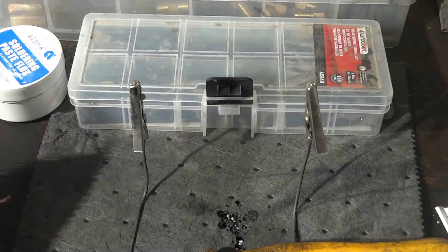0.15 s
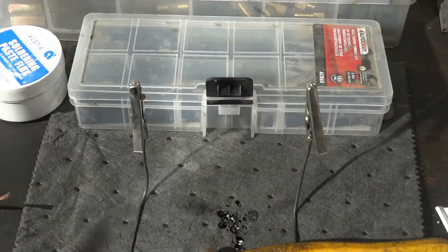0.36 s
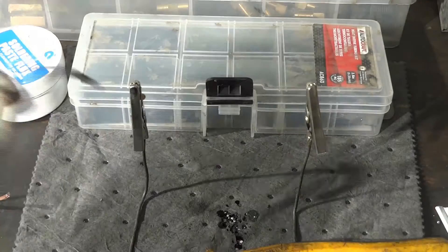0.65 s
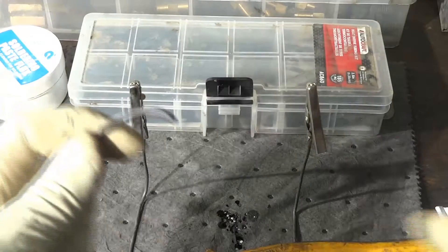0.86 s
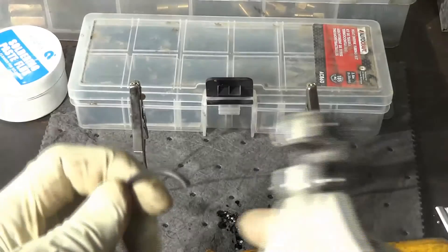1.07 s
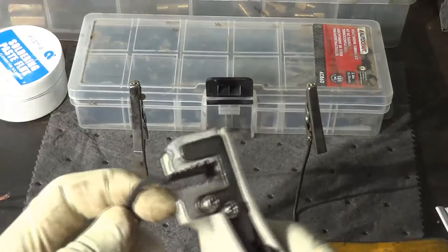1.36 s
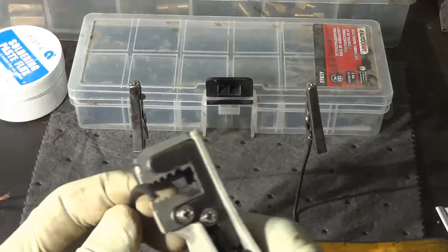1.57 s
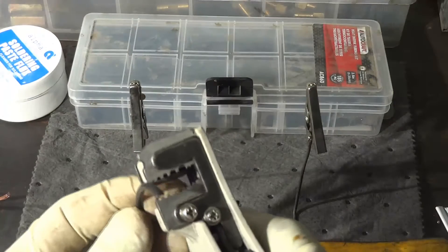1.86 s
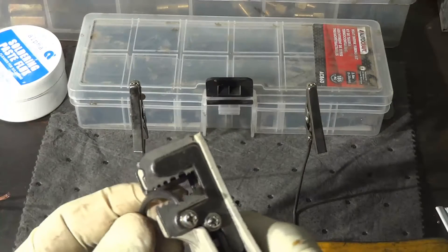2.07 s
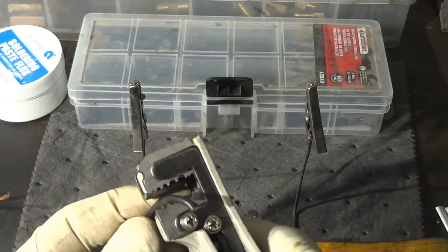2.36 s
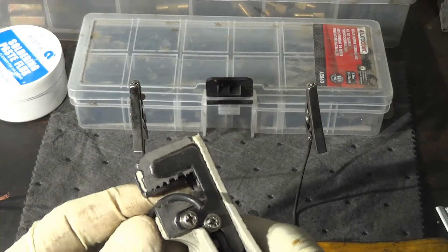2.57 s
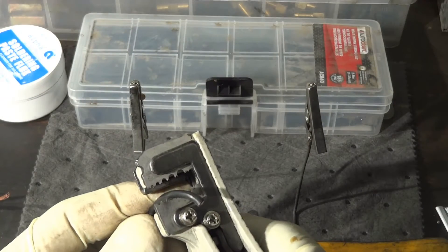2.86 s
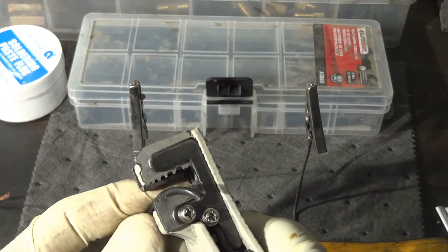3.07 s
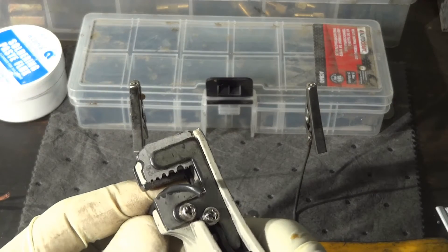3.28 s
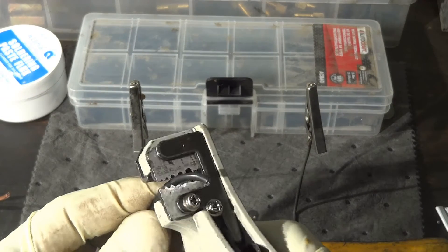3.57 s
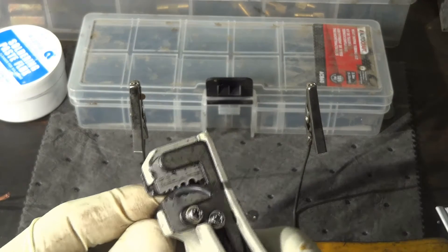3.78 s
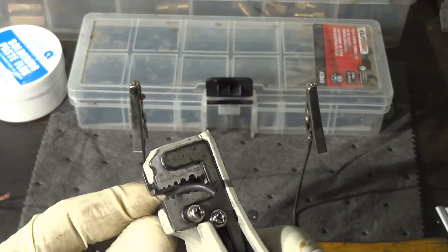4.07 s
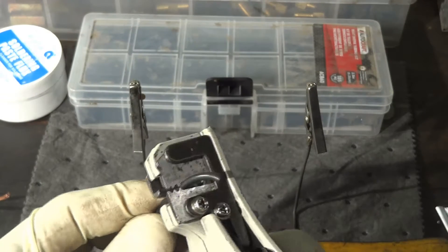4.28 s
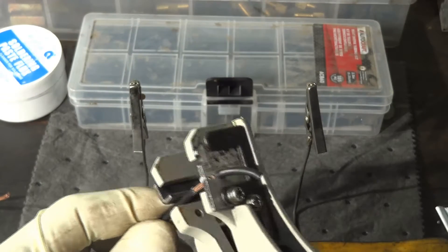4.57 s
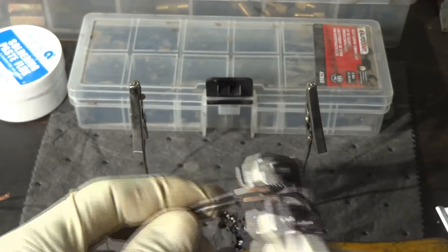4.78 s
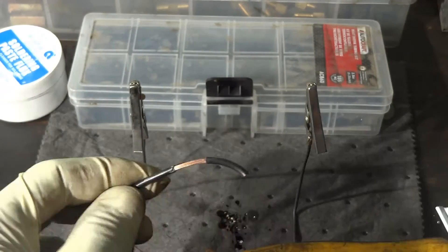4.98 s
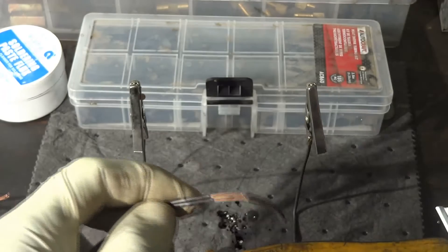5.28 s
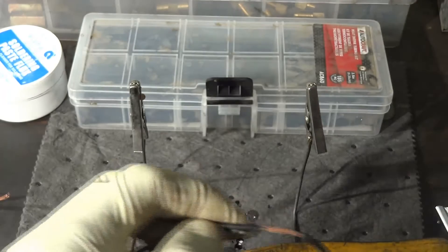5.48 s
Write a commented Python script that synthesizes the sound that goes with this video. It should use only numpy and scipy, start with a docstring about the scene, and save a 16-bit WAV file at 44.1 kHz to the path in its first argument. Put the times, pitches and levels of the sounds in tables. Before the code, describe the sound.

A hand tool knocks on a bench, clicks faintly, then bites in crisp steel snaps and springs open with a bright rattle before dull closing knocks.

```python
"""Wire stripper at a workbench

A hand-held wire stripper is lifted from a bench, closes on a wire in steel clicks, snaps through
the insulation and is laid down with a few knocks; rubber gloves rustle; a small workshop hums and hisses.
Blows are pulses with a dying chatter that excite decaying modes; hum, hiss and rubber are shaped noise.
Sparse decaying echoes add the tails of bench and workshop, and gain control holds the loud blows down."""
import sys
import numpy as np
from scipy import signal
from scipy.fft import rfft, irfft, next_fast_len
from scipy.io import wavfile
from scipy.ndimage import uniform_filter1d

SR = 44100
rng = np.random.default_rng(int(sys.argv[2]) if len(sys.argv) > 2 else 0)


def wrap_up_sound(samples):
    """Save the sound to the file named by the first command line argument, as 16-bit audio."""
    columns = np.atleast_2d(samples).T
    # keep every value between -1 and 1, then stretch to whole-number steps
    tamed = np.clip(columns, -1, 1)
    steps = np.round(tamed * 32767).astype(np.int16)
    wavfile.write(sys.argv[1], SR, steps)


N = 248283  # length in samples


def gain_of(db):
    """Logarithmic level: 20 dB is a factor of ten in amplitude."""
    return 10 ** (np.asarray(db) / 20)


def evened(x):
    """Normalization: scales to an rms of 1."""
    return x / np.sqrt(np.mean(x ** 2) + 1e-20)


def read(points, hz):
    """Interpolation of a spectrum table on a log-frequency axis."""
    f, value = np.transpose(points)
    return np.interp(np.log(hz + 1), np.log(f + 1), value)


def add(mix, s, sound):
    """Superposition: mixes a sound in at s seconds."""
    part = mix[max(round(s * SR), 0):][:len(sound)]
    part += sound[:len(part)]


# likeness of the left and right noise: [f/Hz, correlation]
SAME = [(60, 0.94), (130, 0.98), (290, 0.83), (640, -0.023), (1410, 0.09), (3100, 0.39), (6820, 0.96),
        (15000, 1)]


def hiss(size, patchy_db):
    """Partly coherent noise: two-channel random spectra with drifting patches; returns times, f/Hz, spectra."""
    frames = 4 * N // size + 5
    hz = np.fft.rfftfreq(size, 1 / SR)
    a, b, c, d, patches = rng.standard_normal((frames, len(hz), 5)).T
    patches = uniform_filter1d(patches, size=12, axis=0)
    patches = evened(uniform_filter1d(patches, size=12, axis=1))
    same = np.clip(read(SAME, hz), -1, 1)[:, None]
    left = a + 1j * b
    right = same * left + np.sqrt(1 - same ** 2) * (c + 1j * d)
    times = np.arange(frames) * size / 4 / SR
    return times, hz[:, None], np.array([left, right]) * gain_of(patchy_db * patches)


# usual colour of the workshop hum and hiss: [f/Hz, relative level/dB per Hz]
AIR = [(12, -32), (20, -10), (43, -15), (65, -8.5), (158, -7), (234, -7), (270, -2.5), (310, -12),
       (399, -11.5), (825, -18.5), (1860, -23), (2820, -26), (3160, -26.5), (13900, -36.5), (16000, -45.5)]
# its slow changes: [t/s, level/dB, hiss above the usual colour/dB]
AIR_DB = [(0, -50.5, 1), (.6, -51, 4.5), (1.2, -50.5, 2), (2, -53.5, 0), (4.1, -54, -.5), (4.7, -54.5, 4.5),
          (5.63, -48.5, -3)]


def air():
    """Shaped noise with a slowly varying level: the hum and hiss of the workshop."""
    times, hz, z = hiss(size=1024, patchy_db=.6)
    s, level_db, hiss_db = np.transpose(AIR_DB)
    treble = np.clip(np.log2((hz + 1) / 400) / 2, 0, 1)  # full from 1600 Hz up
    z = z * gain_of(read(AIR, hz) + treble * np.interp(times, s, hiss_db))
    sound = evened(signal.istft(z, nperseg=1024, noverlap=768)[1][:, :N])
    return sound * gain_of(np.interp(np.arange(N) / SR, s, level_db))


def tail(x, bands, spread):
    """Diffuse reverberation: sparse taps of random sign, each band dying at its own speed.

    The two ports differ most where the room air differs."""
    taps = np.zeros((3, SR // 2))
    at = np.arange(150, SR // 2 - 10, 10) + rng.integers(0, 10, (3, (SR // 2 - 151) // 10))
    np.put_along_axis(taps, at, rng.choice([-1., 1.], at.shape), 1)
    hz, t, z = signal.stft(taps, SR, nperseg=512)
    shared = np.clip(1 - spread * (1 - read(SAME, hz)), 0, 1)[:, None]
    f, db, t60 = np.transpose(bands)
    level_db = read(list(zip(f, db)), hz)[:, None]
    band_t60 = read(list(zip(f, t60)), hz)[:, None]
    z = shared * z[0] + np.sqrt(1 - shared ** 2) * z[1:]
    echoes = signal.istft(z * gain_of(level_db - 60 * t / band_t60), SR, nperseg=512)[1]
    echoes[:, :150] = 0  # silence before the first echo
    return signal.fftconvolve(x[None], echoes / np.linalg.norm(taps[0]), axes=1)[:, :N]


# dense tail of the workshop: [f/Hz, relative level/dB, t60/s]
ROOM = [(803.5, 8, 0.15), (2050, -6.5, 0.48), (4920, -3.5, 0.26), (9190, -3.5, 0.32), (14200, -1, 0.1356)]


def workshop_tail(x):
    """Reverberation of the workshop around the tool."""
    return tail(gain_of(8.0) * x, ROOM, spread=0.19)


# dense tail of the bench and the things on it: [f/Hz, relative level/dB, t60/s]
BENCH_TAIL = [(60.25, -11, 0.36), (100.7, 1.5, 1), (246, -1.5, 0.71), (608.4, 5.5, 0.27), (1000, -4, 0.34),
              (2464, 0, 0.27), (5110, -6, 0.25), (12060, -2.5, 0.18)]


def bench_tail(x):
    """Reverberation of the bench and the things on it."""
    return tail(gain_of(7.0) * x, BENCH_TAIL, spread=0.065)


# gloves rubbing on tool and wire, one row a stroke:
# [start t/s, length/s, relative level/dB, treble above the usual colour/dB]
RUBS = [(0, 0.053, -51, -6), (.14, 0.19, -56, 2), (0.511, 0.048, -57, 9), (0.794, .3, -55.5, 0),
        (1.137, .3, -58.5, -17), (1.447, 0.51, -64.5, -17), (3.05, 0.058, -69, 12),
        (3.24, 0.035, -55.5, -6), (3.27, 0.023, -47.5, -15), (3.301, 0.013, -51, -8), (3.33, 0.5, -65, 5.5),
        (4.244, 0.27, -65.5, 10), (4.42, 0.09, -68, 7), (4.612, 0.24, -60, 11.5), (4.917, 0.12, -56, 6),
        (5.327, 0.066, -58, 12)]
# usual colour of the rubbing: [f/Hz, relative level/dB]
RUB = [(400, -18.5), (1000, -4.5), (1800, -7.5), (2200, -1.5), (2600, -1), (3300, -1), (5000, -11),
       (9000, -16.5), (15000, -21)]
RUB_RISE_S, RUB_FALL_S = 0.0136, 0.019


def gloves():
    """Stick-slip friction: rubber slips in quick uneven grains, noise that flickers across all bands at once."""
    t, hz, z = hiss(size=256, patchy_db=3.0)
    slips = evened(uniform_filter1d(rng.standard_normal(len(t)), size=4))
    treble = np.clip(np.log2((hz + 1) / 3000) / 1.9, 0, 1)
    strokes = 0
    for start, length, level_db, treble_db in RUBS:
        rise = (t - start) / RUB_RISE_S + .5
        fall = (start + length - t) / RUB_FALL_S + .5
        envelope = np.clip(np.minimum(rise, fall), 0, 1) ** 2
        strokes = strokes + envelope * gain_of(level_db + treble * treble_db)
    colour = gain_of(read(RUB, hz))
    z = z[0] * colour / np.linalg.norm(colour) * strokes * gain_of(3.54 * slips)
    return signal.istft(z, nperseg=256, noverlap=192)[1][:N]


def blows(events, usual, modes, crack_db, scatter_db, lead_db, swell_db, chatter_db, size):
    """Modal excitation by impact: a pulse and a dying chatter drive decaying sines.

    Returns the ringing heard close by and the plain thud that feeds the tail."""
    near, thud = np.zeros((2, N))
    t, hz = np.arange(size) / SR, np.fft.rfftfreq(size, 1 / SR)
    early = 128  # samples of room ahead of the pulse
    f, db, t60 = np.transpose(modes)[:, :, None]
    rings = gain_of(-60 * t / t60) * np.sin(2 * np.pi * f * t)
    rings = rfft(gain_of(db) * rings / np.linalg.norm(rings, axis=1, keepdims=True))
    signs = (-1.) ** np.arange(len(modes))  # neighbours in opposite phase leave no notch between them
    octaves = np.log2(np.clip(hz, usual[0][0], usual[-1][0]))
    for s, peak_db, ring_hz, brightness_db, chatter_t60 in events:
        place = rng.standard_normal(len(modes))
        grit = rng.standard_normal((2, size))
        rattle = grit[0] * abs(grit[1])
        dull = uniform_filter1d(rattle, size=3)
        fading = gain_of(-60 * t / max(chatter_t60, .002))
        # the highest treble of a rattle dies first
        drive = gain_of(chatter_db) * fading * (dull + (rattle - dull) * fading ** 0.3)
        drive[0] = 1  # the pulse
        # modes near one pitch are raised; the levels of all modes vary at random with the spot struck
        favoured_db = lead_db * np.exp(-(np.log(f[:, 0] / ring_hz) / 0.06) ** 2)
        body = (signs * gain_of(favoured_db + scatter_db * place)) @ rings + gain_of(crack_db)
        # the colour tilts with brightness and swells broadly around the strongest ring
        swell = swell_db * np.exp(-(np.log((hz + 1) / ring_hz) / 0.36) ** 2)
        colour_db = read(usual, hz) + brightness_db * octaves + swell
        # small parts radiate little far below their lowest mode
        colour = gain_of(colour_db) / (1 + (0.78 * f[0] / (hz + 1)) ** 4)
        colour *= gain_of(peak_db) / abs(irfft(colour * body, size)).max()  # the pulse alone sets the peak
        plain = rfft(np.roll(drive, early)) * colour
        ringing, plain = irfft(plain * body, size), irfft(plain, size)
        add(near, s - early / SR, ringing)
        add(thud, s - early / SR, plain * np.linalg.norm(ringing) / np.linalg.norm(plain))
    return near, thud


# the bench lies off to the right of the two microphone ports: [f/Hz, left minus right level/dB]
BENCH_BALANCE = [(60, 0.52), (950, -1.3), (15000, -1.6)]
# and the phase between them: [f/Hz, left lead/rad]
BENCH_PHASE = [(0, 0), (780, 0.2), (3880, 0.018), (16500, 0.24)]


def from_bench(x):
    """Stereo localization: level and phase differences between the ports for a sound from the side."""
    size = next_fast_len(N)
    hz = np.fft.rfftfreq(size, 1 / SR)
    half = gain_of(read(BENCH_BALANCE, hz) / 2) * np.exp(.5j * read(BENCH_PHASE, hz))
    return irfft(rfft(x, size) * np.array([half, 1 / half]), size)[:, :N]


# blows on the bench: [t/s, pulse peak level/dB, strongest ring f/Hz, brightness/dB per octave, chatter t60/s]
KNOCKS = [(.2606, -5, 970, 1.5, 0.033), (.2695, -18, 349, -2, 0.013), (.3183, -10, 278, 2.5, 0.03),
          (.327, -3, 1020, 1.5, 0.054), (.4129, -23.5, 350, 4, .028), (5.1913, -12.5, 416, 1.5, 0.04),
          (5.3832, -12, 270, 3, 0.03), (5.3924, -8, 970, 0, 0.012), (5.4125, -9, 287, .5, 0.041),
          (5.4518, -11, 946, -2, 0.0074), (5.5029, -12, 1160, 0.5, 0.012),
          (5.5055, -10.5, 315, -1.5, 0.0069)]
# usual colour of a blow: [f/Hz, relative level/dB]
KNOCK = [(250, -2.5), (580, -3.5), (1050, -4), (2050, -12), (3700, -13), (10000, -29)]
# modes of the bench with the tool on it: [f/Hz, relative level/dB, t60/s]
BENCH = [(111, -6.5, .2), (207.3, 5, 0.078), (238, 4.5, 0.009), (370, 2, 0.087), (565, -3, 0.0067),
         (672, 3.5, 0.02), (890, 0.5, 0.057), (1140, 4, 0.013), (1340, -19, 0.054), (1780, -6.5, 0.0068),
         (2313, 8.5, 0.0073), (2973, 8, 0.0029), (3800, -5, 0.044)]


def bench_knocks():
    """Modes of the bench under impact: the knocks, heard from the side."""
    near, thud = blows(KNOCKS, KNOCK, BENCH, crack_db=12.5, scatter_db=2, lead_db=6.0,
                       swell_db=7, chatter_db=-18.5, size=8192)
    return from_bench(near + bench_tail(thud))


# low dull thumps of the handles under two of the clicks:
# [t/s, pulse peak level/dB, strongest ring f/Hz, brightness/dB per octave, chatter t60/s]
THUMPS = [(.9139, -29, 1300, -4, 0.01), (4.4567, -31, 350, -6, .015)]
# usual colour of a thump: [f/Hz, relative level/dB]
THUMP = [(300, 0), (1100, 0)]
# modes of the handles: [f/Hz, relative level/dB, t60/s]
HANDLES = [(352, 7, .02), (780, 5, 0.011), (1250, -2, 0.0082)]


def handle_thumps():
    """Low, heavily damped modes: dull thumps of the handles under two of the clicks."""
    return blows(THUMPS, THUMP, HANDLES, crack_db=6, scatter_db=0, lead_db=0,
                 swell_db=0, chatter_db=-20, size=4096)[0]


# faint ticks fall at random while the levers creep: [start t/s, length/s, ticks per s, usual ring f/Hz]
CREEPS = [(.84, .26, 24, 2100), (3.3, .25, 20, 6000), (3.77, .1, 30, 8000), (4.44, .1, 30, 11000),
          (4.67, .05, 60, 10000)]
TICK_DB, TICK_T60 = -35, 0.014  # pulse peak level/dB, chatter t60/s
TICK_OCTAVES = 0.16  # scatter of the ring either way
TICK_TURN_HZ, TICK_LEAN_DB = 5000, 9.5  # ticks ringing above the turn are brighter, below it duller


def ticks():
    """Random point process: faint clicks at random moments and pitches, as rows like those of CLICKS."""
    rows = []
    for start, length, per_s, usual_hz in CREEPS:
        for when, pitch in rng.random((round(length * per_s), 2)):
            ring_hz = usual_hz * 2 ** (TICK_OCTAVES * (2 * pitch - 1))
            brightness_db = TICK_LEAN_DB * np.log2(ring_hz / TICK_TURN_HZ)
            rows.append((start + when * length, TICK_DB, ring_hz, brightness_db, TICK_T60))
    return rows


# parts of the tool meeting; the long rattle is the jaws springing back:
# [t/s, pulse peak level/dB, strongest ring f/Hz, brightness/dB per octave, chatter t60/s]
CLICKS = [(0.014, -25.5, 2190, -11, 0.025), (0.1436, -34, 2000, -11.5, .015),
          (0.321, -26, 11000, -12, 0.015), (.6813, -38, 1590, -8, 0.016), (0.7961, -30, 2150, -9.5, 0.015),
          (0.8862, -23, 2080, -7, .02), (.9139, -20.5, 2010, -6.5, 0.014), (0.9266, -23, 10300, 5, 0.014),
          (1.0165, -23.5, 2100, -5, 0.017), (1.1634, -33, 2450, 6, 0.013), (1.3354, -32.5, 9350, -5, 0.045),
          (3.333, -36, 9800, 5, .025), (3.366, -27, 4510, 2.5, 0.018), (3.3943, -24.5, 4500, 2, 0.038),
          (3.4003, -33, 12480, -3.5, .017), (3.4381, -32, 13400, 1, .015),
          (3.4627, -24.5, 12500, -0.5, 0.046), (3.4775, -38, 4010, -3, .015),
          (3.5097, -32.5, 6400, -4.5, 0.032), (3.5233, -33, 5740, -6.5, .018),
          (3.534, -25.5, 5570, 6, .021), (3.779, -17.5, 15500, 4.5, 0.025), (3.821, -25, 12100, 3, 0.012),
          (3.824, -28, 6200, 6, 0.02), (3.8422, -17, 11850, 1, 0.024), (3.863, -12.5, 12000, 3.5, 0.017),
          (3.869, -27.5, 7620, 2, .02), (4.114, -40, 8000, 5, 0.021), (4.176, -28.5, 7360, 2, 0.043),
          (4.205, -18.5, 8100, 4, 0.031), (4.2129, -11.5, 12650, -0.5, .014),
          (4.2176, -20, 6940, -1, 0.0086), (4.2332, -23, 5070, -1, 0.028), (4.4465, -38, 8160, -6, .015),
          (4.4567, -11.5, 5160, -5, 0.018), (4.474, -37.5, 10350, 0, .015),
          (4.656, -27.5, 3680, -2.5, 0.029), (4.682, -31, 10730, -7, 0.013),
          (4.6874, -28.5, 11800, 1, 0.025), (4.6986, -28, 8240, 11, 0.014), (4.7027, -26, 8650, 1, 0.016),
          (4.7388, -2, 9200, 2, 0.26), (4.7424, -6, 11000, 13, .012), (4.7487, -19, 11440, 8, .015),
          (4.7679, -3, 9000, 11, .012), (4.857, -15, 11000, 4, .02), (4.8605, -16, 10360, -5.5, 0.013)]
# usual colour of a click: [f/Hz, relative level/dB]
CLICK = [(1500, -10.5), (2200, -6), (4550, -2), (7200, -5), (12800, -3.5)]
# modes of the steel jaws and levers: [f/Hz, relative level/dB, t60/s]
STEEL = [(1590, -1, 0.02), (2030, -0.5, 0.011), (3124, 0, 0.017), (3780, 6, 0.0011), (4650, -4, 0.04),
         (5660, -1.5, 0.0019), (6900, -31, 0.003), (6880, -1, 0.015), (7800, 11, 0.0016),
         (7920, 2.5, 0.017), (9970, 5, 0.0017), (10900, 6.5, 0.0092), (12300, 1.5, 0.0034),
         (12960, -16, 0.017), (13200, 8, 0.0053), (15700, 2, 0.0051)]


def steel_clicks():
    """Stiff-body modes under impact: steel parts click; returns the ringing and the plain thud."""
    return blows(CLICKS + ticks(), CLICK, STEEL, crack_db=16.5, scatter_db=5.0, lead_db=14.5,
                 swell_db=1.5, chatter_db=-19.5, size=16384)


def scene():
    """Superposition of sources: knocks from the side, the tool and gloves in the middle, air all round."""
    rubs = gloves()
    knocks = bench_knocks()
    thumps = handle_thumps()
    clicks, click_thuds = steel_clicks()
    tool = clicks + thumps + rubs + workshop_tail(click_thuds + rubs)
    return air() + knocks + tool


EDGE_HZ = 15950  # upper band limit


def record(dry):
    """Dynamic compression and low-pass filtering: loud blows are held down and let go slowly, then band-limited."""
    peak_db = 20 * np.log10(abs(dry).max(0) + 1e-9)
    fall = np.arange(N) * 84.0 / SR  # the held peak falls 84 dB a second
    held_peak_db = np.maximum.accumulate(peak_db + fall) - fall
    over_db = np.maximum(held_peak_db + 6.5, 0)  # excess above -6.5 dB
    held = dry / gain_of(0.46 * uniform_filter1d(over_db, size=40))
    low_pass = signal.firwin(511, EDGE_HZ, window=("kaiser", 9), fs=SR)
    return signal.oaconvolve(held, low_pass[None], "same")


dry = scene()
out = record(dry)
wrap_up_sound(out)
```